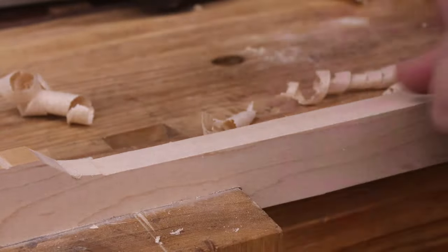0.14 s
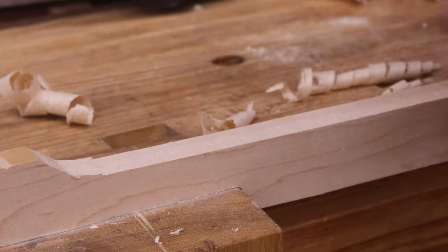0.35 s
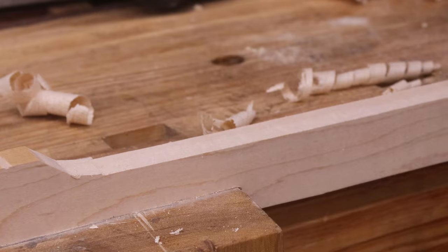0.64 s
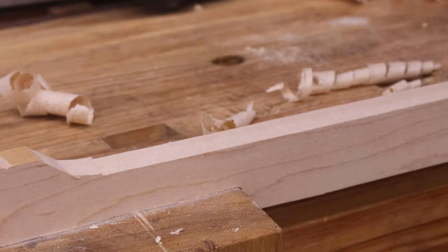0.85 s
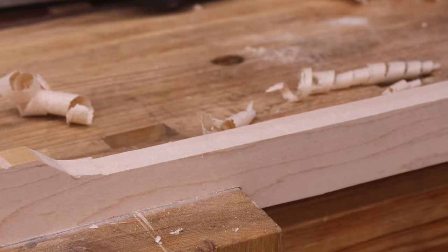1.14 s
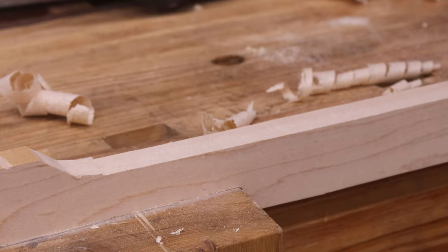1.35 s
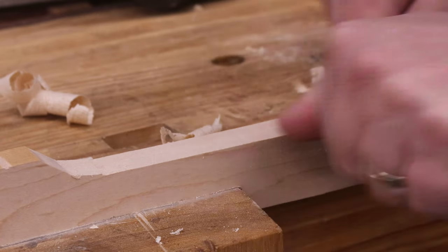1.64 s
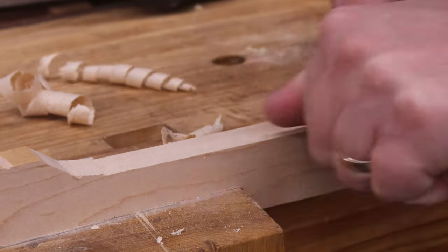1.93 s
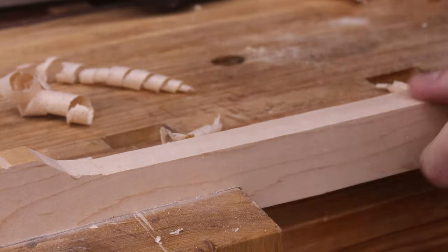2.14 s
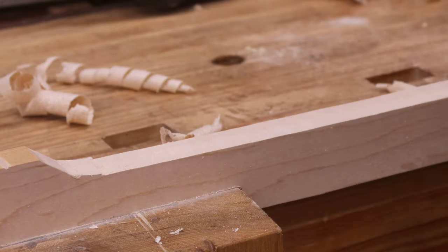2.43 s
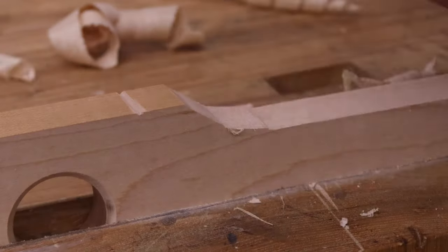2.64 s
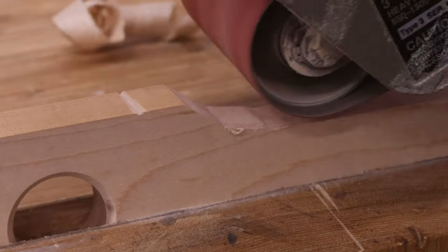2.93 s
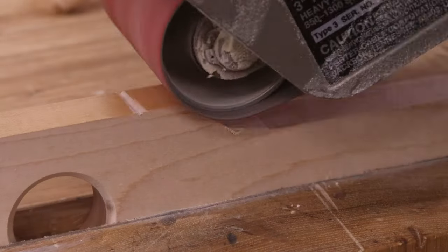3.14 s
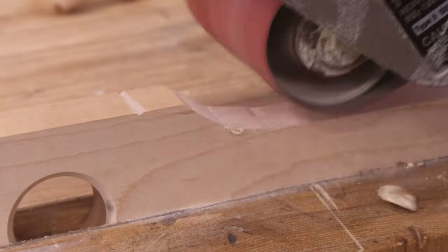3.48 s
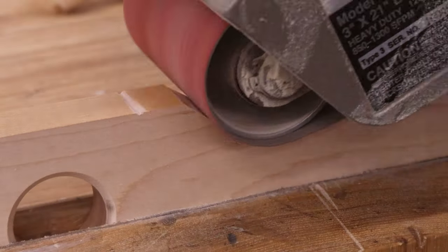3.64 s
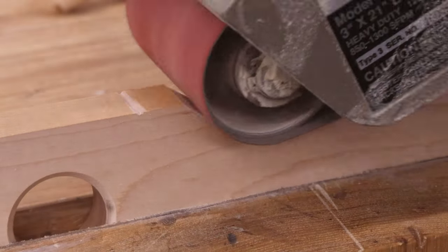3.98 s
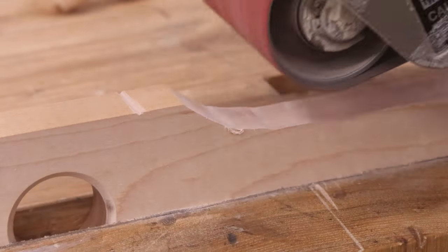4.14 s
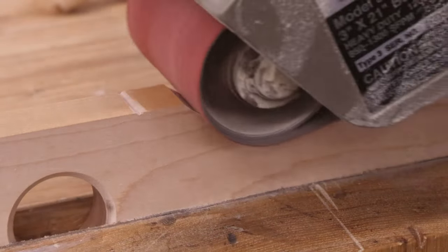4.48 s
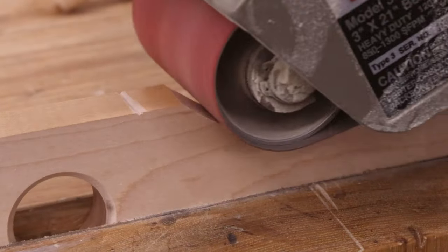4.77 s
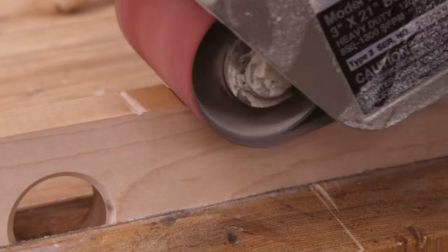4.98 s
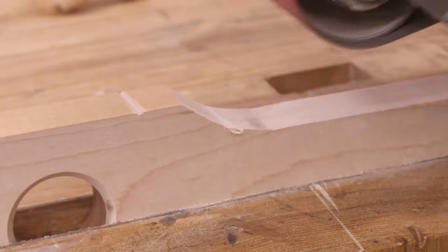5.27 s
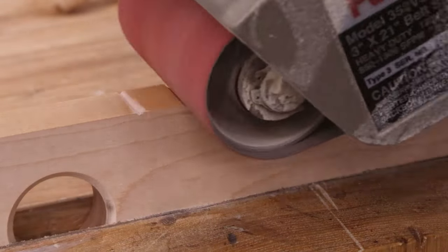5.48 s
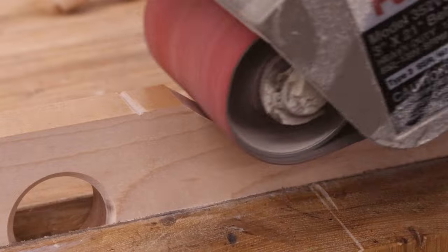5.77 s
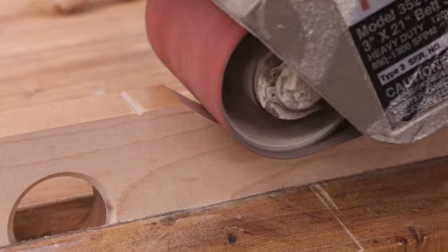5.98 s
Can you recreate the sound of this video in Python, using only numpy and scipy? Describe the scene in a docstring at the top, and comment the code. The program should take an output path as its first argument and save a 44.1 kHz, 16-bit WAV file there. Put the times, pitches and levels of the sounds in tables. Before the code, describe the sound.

A spokeshave scrapes along a hardwood bar, close and wide in a quiet, fairly dry workshop. Two short rasping cuts come at about 0.1 and 0.5 seconds. From 0.8 to 1.7 seconds a longer cut judders and catches, with crackling fibres and a ring from the wood and blade. A few small scrapes follow, and the last shaving slides out with a brief bright hiss at about 2 seconds. Light rubs and knocks of tool handling last until 2.8 seconds, with a soft low thud from the bench near 2.4.

At 2.8 seconds a belt sander starts with a clank and quickly runs up to speed, centred in the image. Its belt grinds on the wood with a gritty hiss and a rattling housing under a high gear and motor whine. The pitch sags slightly and recovers about six times as it is pressed down, continuing to the end at about 6 seconds.

```python
"""At a workshop bench, a spokeshave is pushed along a hardwood bar: two short cuts, then a long one
that judders and runs out. Snapping fibres ring the bar, the bench and the blade, and the last shaving
curls out with a hiss. Light rubs, knocks and a soft thud follow as the tools are handled.
Then a belt sander jolts into motion and grinds on, its gear and motor whine sagging with each lean."""
import sys
import numpy as np
from scipy import signal
from scipy.fft import rfft, irfft
from scipy.io import wavfile
from scipy.ndimage import uniform_filter1d

SR = 44100
rng = np.random.default_rng(int(sys.argv[2]) if len(sys.argv) > 2 else 0)


def transcribe(u):
    """Save the signal u as a 16-bit wav file named by the first command-line argument.

    u: samples, shape (n,) or (channels, n), limited to [-1, 1]; the rate is SR.
    q: integer samples, one column per channel.
    """
    v = np.clip(np.atleast_2d(u).T, -1, 1)
    q = np.round(v * 32767).astype(np.int16)
    wavfile.write(sys.argv[1], SR, q)


N = 269451
TIME = np.arange(N) / SR
FREQ = np.fft.rfftfreq(N, 1 / SR)
SANDER_START_S = 2.794


# stereo image of the cut: (frequency [Hz], left phase lead [rad], likeness of the sides [0-1])
CUT_IMAGE = [(165, 0.66, .72), (400, 0.26, 0.91), (820, 0.33, 0.91), (1510, 0.45, 0.97), (2170, 1.76, 0.75),
             (3070, 2.06, 0.74), (3520, 3.67, 0.79), (4540, 4.55, 0.9), (5770, 4.47, 0.56),
             (14000, 4.7, 0.5)]

def spokeshave():
    """The cut and its short room tail, wide in stereo, with the left side slightly leading."""
    force, focus = cutting()
    slip = undb(1.47 * walk(420))  # stick-slip flutter
    shared, apart = (rfft(room(shaving(force, slip, *focus), t60=.16, wet_db=-21)) for _ in range(2))
    lead, likeness = across(CUT_IMAGE)
    shared = shared * np.sqrt((1 + likeness) / 2)
    apart = apart * np.sqrt((1 - likeness) / 2)
    stereo = irfft([shared + apart, (shared - apart) * np.exp(-1j * lead)], N)
    return stereo + wide_ring(body=force[1])


# modes of the clamped bar and bench: (pitch [Hz], width [Hz], relative level [dB])
WOOD_MODES = [(86, 72, -8), (159.6, 33, -1.5), (258.8, 18, 3), (347, 58, -4), (415, 34, 1), (508, 50, 2),
              (584, 66, -4), (714, 74, -5), (814, 48, -0.5), (996, 106, -1.5)]
# modes of the blade and its iron body: (pitch [Hz], width [Hz], relative level [dB])
BLADE_MODES = [(1262, 96, 1), (1468, 56, 3), (1622, 98, 3.5), (1780, 53, 2), (1940, 100, -1.5),
               (2148, 56, 3.5), (2355, 200, 1.5), (2802, 197, 1), (3140, 89, -7.5), (3410, 63, -3.5),
               (3786, 68, -7)]
# tone of tearing fibres: (frequency [Hz], relative level [dB])
FIBRE_TONE = [(2500, -35), (3700, -1.5), (4300, 3.5), (6000, 0.5), (9000, -4), (12000, -8), (15500, -15)]
# a notch glides down through the wood's ring, where the sound spreads wide left and right:
# (time [s], pitch [Hz], cut or boost [dB])
NOTCH_PATH = [(.7, 1300, -1), (.8, 1210, -11), (1.0, 935, -15), (1.12, 720, -11), (1.46, 780, -13),
              (1.6, 780, 8.5)]

def shaving(force, slip, wood_hz, blade_hz, favour_db):
    """Fibres snap in stick-slip bursts, ringing blade and wood and crackling in the air."""
    rasp, body, crackle = force
    notch = curves(NOTCH_PATH)
    snaps = clicks(rate=6500, spread_db=3) * slip
    splinters = unit(snaps + .77 * clicks(rate=9000, spread_db=.5) * slip)
    early = np.interp(TIME + .0018, TIME, body)  # drive the wood early: its ring takes a moment to build
    wood = ring(snaps * early, WOOD_MODES, band_hz=(50, 1240), focus=(wood_hz, 7.5, .3), notch=notch)
    blade = ring(snaps * rasp, BLADE_MODES, band_hz=(1040, 4100),
                 focus=(blade_hz, favour_db, .15), notch=notch)
    fibres = colour(splinters * crackle, FIBRE_TONE)
    return (undb(-3) * rms(body) * wood + undb(-.93) * rms(rasp) * blade
            + undb(-3.5) * rms(crackle) * fibres)


def wide_ring(body):
    """The wood's ring at the notch pitch spreads wide, left and right in antiphase."""
    notch_hz, notch_db = curves(NOTCH_PATH)
    depth = np.clip(1 - undb(notch_db), 0, 1)
    drive = body * depth * held(NOTCH_PATH[0][0], NOTCH_PATH[-1][0], attack=.05, release=.05)
    snaps = drive * clicks(rate=6500, spread_db=2)
    side = rms(drive) * ring(snaps, WOOD_MODES, band_hz=(400, 1300), focus=(notch_hz, 28, .17))
    return undb(-5) * np.array([side, -side])


# pushes of the blade: (start [s], end [s], rasp drive [dB], build-up [dB], body over rasp [dB],
# crackle over rasp [dB], wood focus [Hz], blade focus [Hz], blade focus boost [dB])
PUSHES = [(0.098, 0.338, -43, 12, 0.5, -11.5, 243, 3600, 12.5),
          (0.488, 0.652, -38.5, 5.5, 0, -6.5, 160, 2640, 1.5),
          (0.757, 0.801, -34, -1, -2, -14.5, 1000, 1800, -2),
          (0.866, 1.132, -40, -1, -2, -14.5, 142, 2020, 3),
          (1.157, 1.662, -45, 9, 1.5, -14.5, 445, 1520, 2.5), (1.722, 1.764, -38, 5.5, 3, -8, 163, 2980, 0),
          (1.84, 1.874, -39, -7, 7, -9.5, 599, 1450, 7), (1.932, 2.064, -38, 5.5, 5, -6.5, 290, 1770, 4.5)]
# the edge catches: (time [s], half length [s], rasp drive [dB], body over rasp [dB],
# crackle over rasp [dB], wood focus [Hz])
EDGE_BITES = [(0.075, 0.0086, -43.5, 8.5, -38, 1010), (0.187, 0.0083, -43, 7, -9, 172),
              (0.23, 0.006, -35, -1.5, -10.5, 314), (0.341, 0.0081, -39.5, 10, -19, 560),
              (0.469, 0.0065, -42.5, 10.5, -9.5, 161), (0.516, 0.0028, -41.5, -5, 1, 160),
              (0.615, 0.004, -36.5, -1, -3, 840), (0.629, 0.0078, -28, 4, -26, 820),
              (0.774, 0.011, -29, -2.5, -8.5, 980), (0.799, 0.007, -34, 3.5, -16, 590),
              (0.869, 0.0052, -33, 6, -26, 750), (0.886, 0.0052, -29, -3.5, -12, 700),
              (0.911, 0.011, -34, 1.5, -7.5, 140), (0.949, 0.0027, -27.5, -16, -9, 810),
              (0.97, 0.0096, -38.5, 2.5, -28, 780), (1.002, 0.0077, -28.5, -4.5, -12.5, 140),
              (1.052, 0.0071, -37, 3.5, -20, 720), (1.08, 0.0043, -21, -12, -14, 460),
              (1.143, 0.0058, -27, -2.5, -27, 885), (1.18, 0.01, -32.5, -1.5, -14, 1040),
              (1.219, 0.0067, -38, -0.5, -12, 1020), (1.26, 0.014, -33.5, -1.5, -11, 139),
              (1.304, 0.007, -38, 6, -15.5, 606), (1.349, 0.0075, -28.5, -1.5, -12.5, 410),
              (1.403, 0.0074, -34.5, 0, -21, 563), (1.437, 0.0074, -31, -2.5, -15.5, 330),
              (1.521, 0.0056, -30.5, 3, -13, 546), (1.534, 0.0071, -34, -19, -8.5, 560),
              (1.565, 0.0027, -26, -19, -11, 310), (1.624, 0.004, -37.5, 5, -26, 700),
              (1.824, 0.0072, -39, 5, -14, 260), (1.908, 0.014, -52, 16.5, -1, 160),
              (1.972, 0.019, -43.5, 17, 1, 370), (2.082, 0.012, -44.5, 14, -37, 252)]

def contacts():
    """Each push and bite: its power, the wood and blade pitches it favours, and the blade's boost."""
    for *stroke, wood_hz, blade_hz, favour_db in PUSHES:
        yield stroke_power(*stroke), wood_hz, blade_hz, favour_db
    for time, half, *levels, wood_hz in EDGE_BITES:
        blade_hz = 1760 * (.008 / half) ** .58  # shorter bites ring higher
        yield swell_power(time, half, *levels), wood_hz, blade_hz, 3.5


def cutting():
    """Rasp, body and crackle envelopes of the cut, and its focus, led by the strongest contact."""
    total, wood, blade, favour = 0, 0, 0, 0
    for power, wood_hz, blade_hz, favour_db in contacts():
        total = total + power
        blade = blade + power[0] * np.log(blade_hz)
        favour = favour + power[0] * favour_db
        wood = wood + power[1] * np.log(wood_hz)
    focus = np.exp(wood / total[1]), np.exp(blade / total[0]), favour / total[0]
    return np.sqrt(total), focus


def stroke_power(start, end, db, build_db, body_db, crackle_db):
    """Power of rasp, body and crackle in one stroke, building as the edge digs in or easing off."""
    build = build_db * (np.clip((TIME - start) / (end - start), 0, 1) - .5)
    rasp = undb(db + build) * held(start, end, attack=.013, release=.014)
    body = undb(db + body_db + .63 * build) * held(start, end, attack=.015, release=.015)
    # fibres tear only once the edge is in, and stop before it leaves
    tearing = held(start + .0084, end - .005, attack=.025, release=.013)
    crackle = undb(db + crackle_db + build) * tearing
    return np.array([rasp, body, crackle]) ** 2


def swell_power(time, half, db, body_db, crackle_db):
    """Power of rasp, body and crackle in one bite or knock, which catches faster than it lets go."""
    skew = .21
    age = (TIME - time) / half + skew
    distance = np.abs(age) / (1 + skew * np.sign(age))
    swell = np.exp(-np.minimum(distance, 10) ** 2)
    return np.outer(undb([db, db + body_db, db + crackle_db]) ** 2, swell)


# the last shaving leaves the tool: (start [s], end [s], level [dB])
CURL_CUE = (1.95, 2.072, -48)
# peaks in its hiss: (pitch [Hz], width [Hz], relative level [dB])
CURL_MODES = [(5430, 540, 2), (6900, 320, -11), (10100, 1800, -7), (13600, 3000, -10)]

def curl():
    """A bright hiss swells as the last shaving slides out, different on each side."""
    start, end, db = CURL_CUE
    hiss = [ring(clicks(rate=9000, spread_db=8), CURL_MODES, band_hz=(4300, 15800)) for _ in range(2)]
    return undb(db) * held(start, end, attack=.041, release=.008) * np.array(hiss)


# the drive takes up its slack: (time [s], decay [s], level [dB])
DRIVE_JOLTS = [(2.795, 0.017, -29.5), (2.8007, 0.0017, -18), (2.805, 0.037, -34)]
# modes of the sander's casting: (pitch [Hz], width [Hz], relative level [dB])
CASTING_MODES = [(512, 190, -9), (850, 280, 0), (1620, 99, 6.5), (1790, 240, -3), (2400, 200, -5),
                 (4000, 2500, -33)]

def sander():
    """The drive jolts the casting, then motor and belt run up together."""
    speed = shaft_speed()
    angle = 2 * np.pi * np.cumsum(speed) / SR
    running = np.clip((TIME - SANDER_START_S) / .013, 0, 1)
    blows = sum(undb(db) * (TIME > time) * np.exp(-np.abs(TIME - time) / decay)
                for time, decay, db in DRIVE_JOLTS)
    clank = rms(blows) * ring(blows * rng.standard_normal(N), CASTING_MODES, band_hz=(420, 12000))
    return running * (motor(speed, angle) + belt(speed, angle)) + clank


# the sander is leaned on, harder until let go: (start [s], let go [s], peak pull on shaft rate [Hz])
SANDER_LEANS = [(2.934, 3.513, 14), (3.669, 4.074, 17.6), (4.242, 4.595, 19.7), (4.788, 5.263, 30.7),
                (5.447, 5.642, 18.3), (5.803, 6.11, 22.7)]

def shaft_speed():
    """Shaft rate in Hz: the motor runs up and sags under each lean, both slowed by its inertia."""
    kick_hz, free_hz, inertia_s, lift_s = 79.8, 332.4, .093, .055
    load = sum(sag_hz * np.interp(TIME, [start, end, end + lift_s], [0, 1, 0]) ** .607
               for start, end, sag_hz in SANDER_LEANS)
    pull = (free_hz - kick_hz - load) * (TIME > SANDER_START_S)
    coast = np.exp(-1 / (inertia_s * SR))
    return kick_hz + signal.lfilter([1 - coast], [1, -coast], pull)


# whine let through by the housing's resonances at each speed:
# (shaft rate [Hz], gear mesh [dB], armature slots [dB], slot octave [dB])
WHINE_LEVELS = [(160, -56, -60, -62), (235, -41, -42, -58), (285, -35, -43, -56), (297, -36.5, -49, -56),
                (307.5, -31.5, -49, -55), (318.7, -33.5, -47, -59.5), (323.6, -33, -45, -58),
                (323.6, -35.5, -41, -55.5)]
# faint motor hum: (pitch [multiple of shaft rate], level at top speed [dB])
HUM_PARTIALS = [(0.99, -65.5), (2, -55), (3, -53), (4, -55.5), (5, -48.5), (11, -57), (32 / 3, -63)]
# the slot whine sings out near full speed: (start [s], end [s], boost [dB])
SING_CUE = (3.013, 3.076, 7.4)

def motor(speed, angle):
    """Gear mesh and armature slots whine in step with the shaft; tooth play roughens the gear."""
    gear_order, slot_order = 16 / 3, 12  # cycles per shaft turn
    shaft_hz, *levels = np.transpose(WHINE_LEVELS)
    gear_db, slot_db, octave_db = (np.interp(speed, shaft_hz, db) for db in levels)
    start, end, boost_db = SING_CUE
    sing_db = boost_db * held(start, end, attack=.04, release=.048)
    gear_db += .5 * walk(10)
    slot_db += 2.5 * walk(10) + sing_db
    gear = undb(gear_db + 1.5 * walk(130)) * np.sin(gear_order * angle + .33 * walk(110))
    slot_angle = slot_order * angle + .2 * walk(90)
    slots = undb(slot_db + 2 * walk(70)) * np.sin(slot_angle)
    octave_fade = np.clip((speed - 240) / 65, 0, 1)
    slots += undb(octave_db + sing_db + 2.8 * walk(45)) * np.sin(2 * slot_angle) * octave_fade
    # the top overtone flutters, and fades as load slows the motor
    third_db = np.interp(speed, [312, 329], [-68, -62]) + 3.4 * walk(45)
    slots += undb(third_db) * np.sin(3 * slot_angle)
    hum = sum(undb(db + 2.4 * walk(18)) * np.sin(order * angle + .5 * walk(18))
              for order, db in HUM_PARTIALS)
    return np.sqrt(2) * (gear + slots + hum * (speed / speed.max()) ** 3)


# tone of belt, rollers and housing: (frequency [Hz], relative level [dB])
HOUSING_TONE = [(30, -52), (90, -42), (150, -21.5), (200, -25.5), (255, -20.5), (370, -19), (460, -14.5),
                (850, -8.5), (1150, -9), (1700, -3), (2400, 0), (3050, -9), (4000, -19.5), (6000, -35)]
# tone of the abrasive: (frequency [Hz], relative level [dB])
GRIT_TONE = [(2500, -22), (4200, 0.5), (5200, 0.5), (6600, -5), (8200, -3.5), (9500, -9.5), (12000, -11.5),
             (15500, -26)]

def belt(speed, angle):
    """Grit tears at the wood, throbbing with the roller, while the drive rattles the housing."""
    age = np.maximum(TIME - SANDER_START_S, 0)
    # both layers surge while the drive pulls the belt up to speed
    rattle_db = -34 + 6.5 * np.exp(-age / .21)
    grit_db = -46.5 + 6 * np.exp(-age / .27)
    shaft_beat = 1 + .13 * np.cos(angle + .97 * walk(40))
    roller = 1 + .023 * np.cos(angle / 12) + .0092 * np.cos(angle / 3.9 + .31 * walk(10))
    throb = shaft_beat * roller
    rattle = colour(clicks(rate=9000, spread_db=1.5) * throb * undb(.22 * walk(230)), HOUSING_TONE)
    grit = colour(clicks(rate=12000, spread_db=2) * throb * undb(.39 * walk(60)), GRIT_TONE)
    # the low end fills in with speed
    thin = signal.sosfiltfilt(signal.butter(4, 360, "high", fs=SR, output="sos"), rattle)
    rattle = thin + (rattle - thin) * np.clip((speed - 230) / 85, 0, 1)
    return undb(rattle_db) * rattle + undb(grit_db) * grit


# tools drawn back and handled:
# (start [s], end [s], rasp drive [dB], build-up [dB], body over rasp [dB], hiss over rasp [dB])
TOOL_RUBS = [(0.0, 0.009, -54, 2, -3, -2), (0.38, 0.45, -64, 0, -5, -9), (0.69, 0.74, -61, -4, -3, -1),
             (2.15, 2.233, -64.5, -1, 3.5, 0), (2.441, 2.467, -54, -2, -4, 2), (2.50, 2.62, -61, 2, 1.5, 1),
             (2.635, 2.672, -46, -6, -2.5, 1.5), (2.702, 2.791, -49.5, -9, -4.5, -2)]
# light knocks: (time [s], half length [s], rasp drive [dB], body over rasp [dB], hiss over rasp [dB])
TOOL_KNOCKS = [(2.332, 0.0054, -46, -11, -9), (2.359, 0.0077, -46.5, 3.5, -21),
               (2.38, 0.0072, -42.5, -12, -24), (2.485, 0.0071, -52, -4, 7), (2.575, 0.0053, -52, -11, 3.5),
               (2.627, 0.0037, -38, 5, -17)]
# scratchy top and woody body of a light touch: (frequency [Hz], relative level [dB])
RUB_RASP_TONE = [(700, -30), (1150, -4), (1700, 0), (2300, 1), (2900, -0.5), (3600, -9.5), (5000, -20)]
RUB_BODY_TONE = [(30, -3), (100, -5.5), (250, -5), (500, 1.5), (650, -4), (1000, 2.5), (1500, -8),
                 (3000, -47)]

def handling():
    """Light rubs and knocks, too weak to make the bar ring."""
    rubs = sum(stroke_power(*rub) for rub in TOOL_RUBS)
    knocks = sum(swell_power(*knock) for knock in TOOL_KNOCKS)
    layers = list(zip(np.sqrt(rubs + knocks), (RUB_RASP_TONE, RUB_BODY_TONE, FIBRE_TONE)))
    mid, side = (sum(rms(force) * colour(force * clicks(rate=9000, spread_db=1.5), tone)
                     for force, tone in layers) for _ in range(2))
    return undb(-5) * mid + undb(-5.5) * np.array([side, -side])


# low modes of the rocking bench: (time [s], pitch [Hz], decay [s], level [dB])
BENCH_THUD = [(2.354, 36, .05, -48), (2.355, 61.7, 0.029, -45.5)]

def bench():
    """A soft, low thud as the bench rocks once."""
    lag_rad = np.array([[0], [1.8]])  # right trails left
    thud = 0
    for time, hz, decay, db in BENCH_THUD:
        age = np.maximum(TIME - time, 0)
        envelope = np.minimum(age * hz * 2, 1) * np.exp(-age / decay)
        thud = thud + undb(db) * envelope * np.sin(2 * np.pi * hz * age - lag_rad)
    return thud


# workshop room tone: (frequency [Hz], relative level [dB])
AIR_TONE = [(25, -7.5), (60, -6.5), (150, -14), (400, -11), (1000, -19.5), (3000, -17), (8000, -27),
            (15500, -31)]

def air():
    """A wide, quiet bed of still air that stops when the sander starts."""
    left, right, both = (colour(rng.standard_normal(N), AIR_TONE) for _ in range(3))
    return undb(-67.5) * (.34 * both + 1.42 * np.array([left, right])) * (TIME < SANDER_START_S)


def room(x, t60, wet_db):
    """A short, diffuse workshop tail behind the direct sound."""
    t = TIME[:SR // 2]
    tail = rng.standard_normal(len(t)) * undb(-60 * t / t60) * (t > .004)
    return x + undb(wet_db) * signal.fftconvolve(x, tail / np.sqrt(np.sum(tail ** 2)))[:N]


def ring(x, modes, band_hz, focus=(1000, 0, .25), notch=(1000, 0)):
    """Drive damped modes, shaded by a focus (Hz, dB, log width) and a notch (Hz, dB); rms 1."""
    drive, out, power = rfft(x), 0, 0
    for k, (hz, width, db) in enumerate(modes):
        gain = undb(db + bell(hz, *focus) + bell(hz, *notch, width=.096))
        response = 1j * FREQ * width / (hz ** 2 - FREQ ** 2 + 1j * FREQ * width)
        out = out + (-1) ** k * gain * irfft(drive * response, N)
        power = power + gain ** 2 * width
    band = signal.butter(4, band_hz, "band", fs=SR, output="sos")
    return unit(signal.sosfilt(band, out / np.sqrt(power)))


def bell(hz, centre_hz, db, width):
    """A bell-shaped boost or cut in dB over log frequency."""
    return db * np.exp(-.5 * (np.log(hz / centre_hz) / width) ** 2)


def colour(x, tone):
    """Minimum-phase EQ along a (Hz, dB) outline; rms 1."""
    cepstrum = irfft(np.log(undb(across(tone)[0])), N)
    cepstrum[1:N // 2] *= 2
    cepstrum[N // 2:] = 0
    return unit(irfft(rfft(x) * np.exp(rfft(cepstrum)), N))


def clicks(rate, spread_db):
    """Tiny fractures of uneven size, about rate a second; rms 1."""
    happens = rng.random(N) < rate / SR
    sizes = undb(spread_db * np.clip(rng.standard_normal(N), -2, 2))
    return unit(happens * sizes * np.sign(rng.standard_normal(N)))


def walk(rate):
    """Smooth random drift that turns about rate times a second; rms 1."""
    step = int(SR / rate)
    stairs = np.repeat(rng.standard_normal(N // step + 1), step)
    return unit(uniform_filter1d(stairs, step)[:N])


def held(start, end, attack, release):
    """Envelope that fades in before start and dies away after end; time constants in seconds."""
    fade = np.maximum(start - TIME, 0) / attack + np.maximum(TIME - end, 0) / release
    return np.exp(-np.minimum(fade, 20))


def curves(table):
    """Each column of a table as a line through time."""
    times, *columns = np.transpose(table)
    return [np.interp(TIME, times, column) for column in columns]


def across(table):
    """Each column of a table as a line across log frequency."""
    hz, *columns = np.transpose(table)
    return [np.interp(np.log(FREQ + 1), np.log(hz), column) for column in columns]


def undb(db):
    """Decibels to gain."""
    return 10 ** (np.asarray(db) / 20)


def rms(x):
    """Root mean square."""
    return np.sqrt(np.mean(x ** 2))


def unit(x):
    """Scale to rms 1."""
    return x / rms(x)


def scene():
    """The handwork plays in stereo; the image folds to mono just before the sander."""
    left, right = spokeshave() + curl() + handling() + bench() + air() + sander()
    width = held(0, 2.6, attack=.01, release=.0077)
    mid, side = (left + right) / 2, (left - right) / 2 * width
    return np.array([mid + side, mid - side])


def record(dry):
    """A steep low-pass takes off the very top."""
    top_hz = 15850
    return signal.sosfilt(signal.ellip(12, .1, 80, top_hz, fs=SR, output="sos"), dry)


dry = scene()
out = record(dry)
transcribe(out)
```